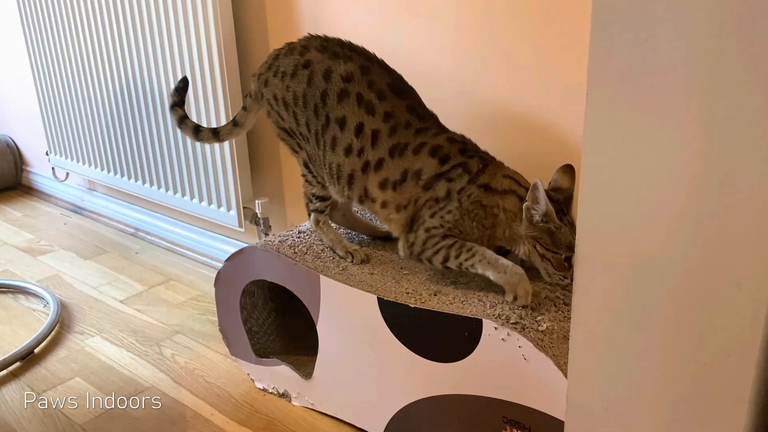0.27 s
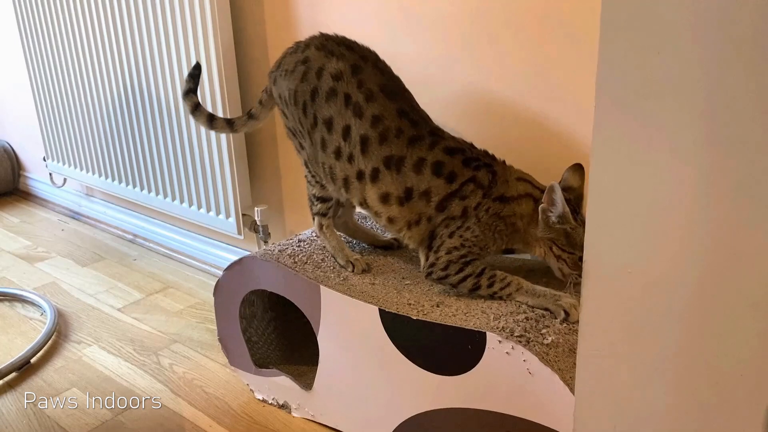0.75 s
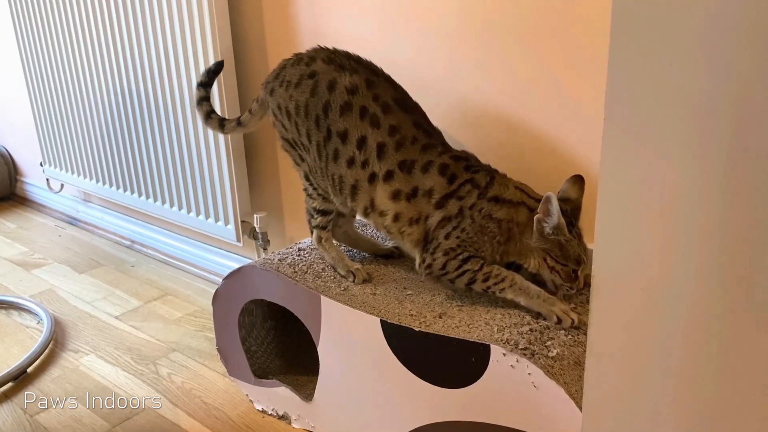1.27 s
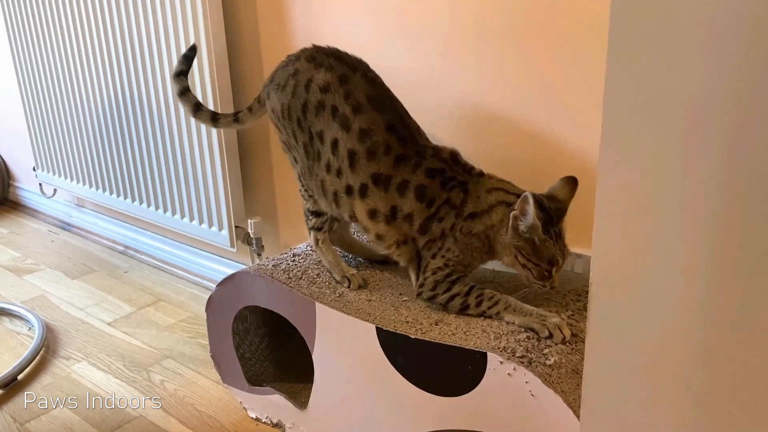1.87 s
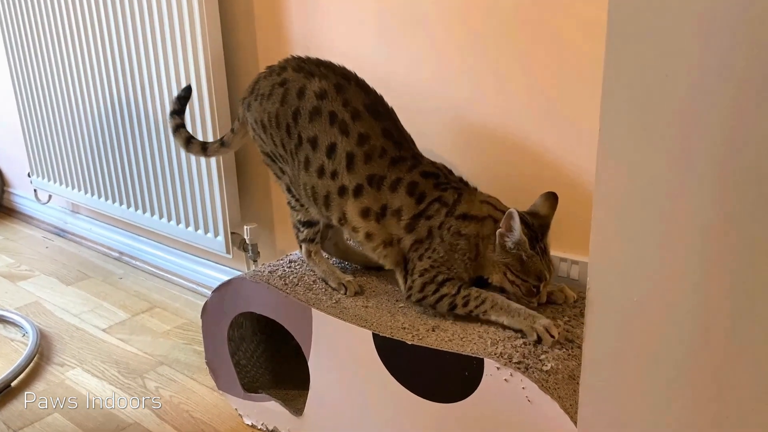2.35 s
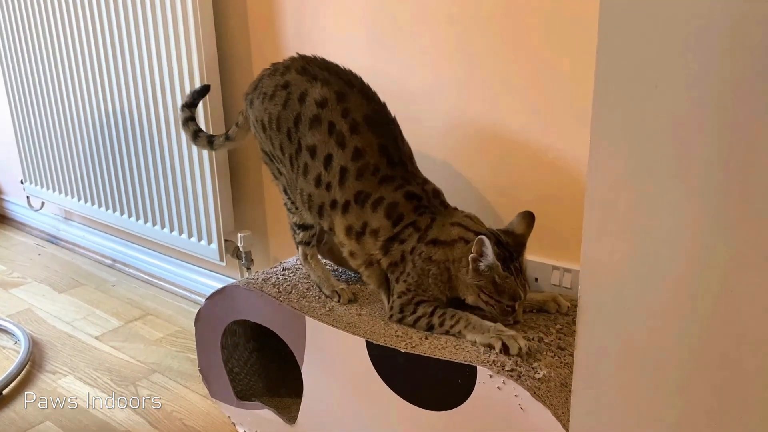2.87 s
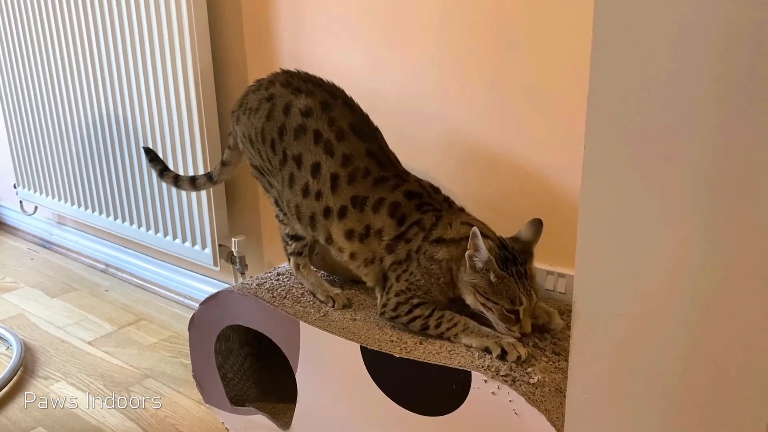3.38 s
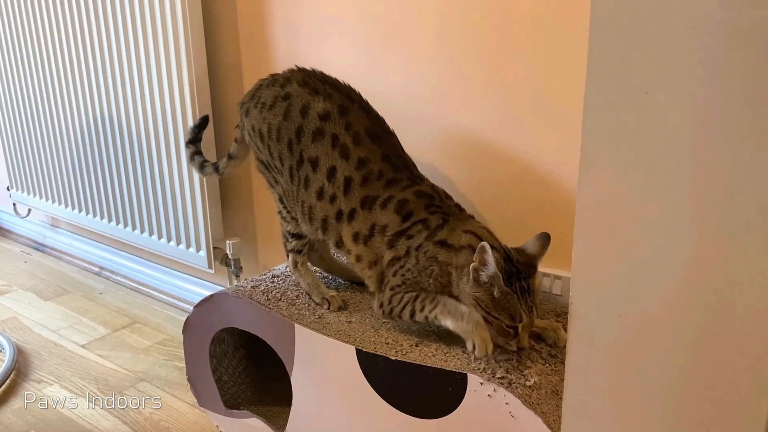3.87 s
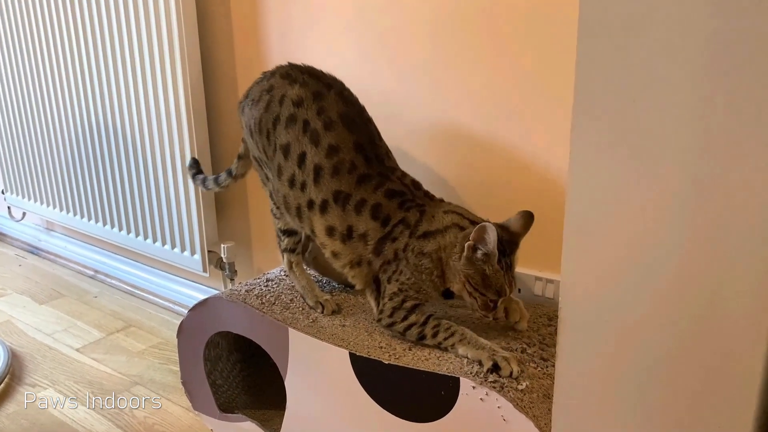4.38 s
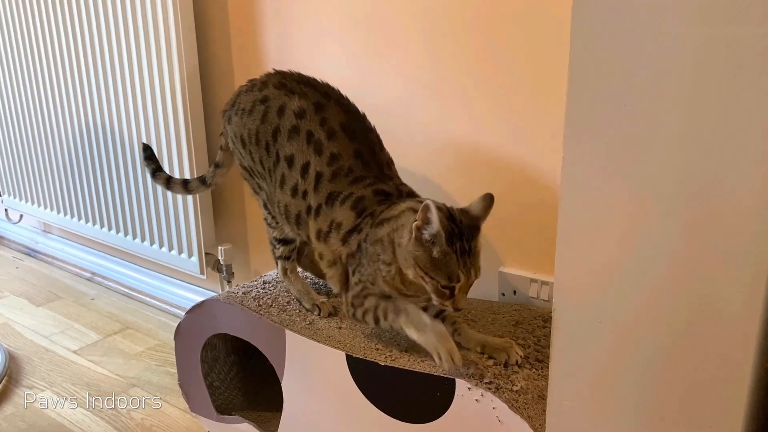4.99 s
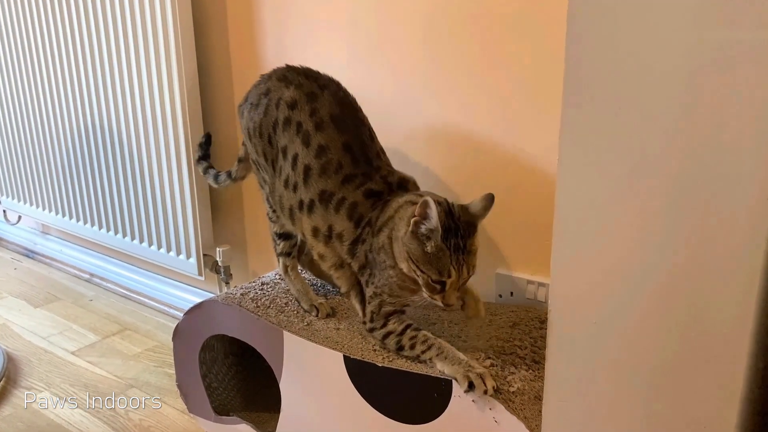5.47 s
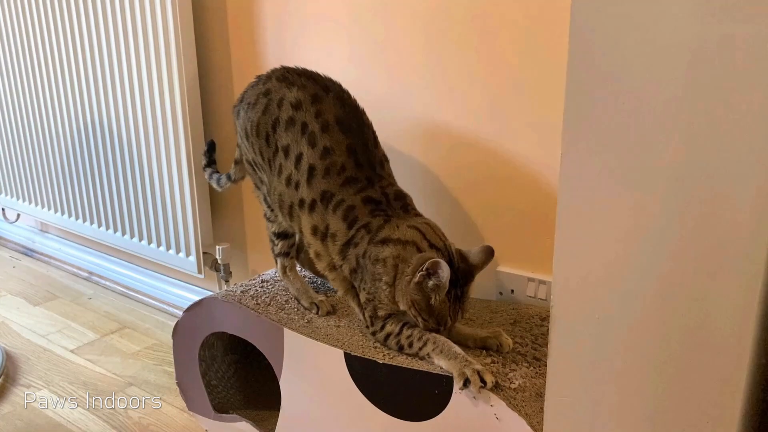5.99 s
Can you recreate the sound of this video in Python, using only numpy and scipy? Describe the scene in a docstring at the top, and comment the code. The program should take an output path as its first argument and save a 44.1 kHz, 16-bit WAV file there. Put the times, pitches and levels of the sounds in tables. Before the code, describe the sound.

In a bare living room with a wooden floor, a cat scratches a hollow cardboard box. Short rasping tugs come in irregular clusters, each with gritty fibre tearing, a woody rattle and a low boxy knock. Small ribs snap and paws rub softly between strokes. Near the end the scratching stops with a weak tug and a brief slide. A stereo microphone nearby catches short room echoes and a faint low hum.

```python
"""A cat rakes a hollow cardboard scratcher in a bare living room with a wooden floor.
A low hum and still air come first: a wavering sine and coloured noise. A rib snaps at once, a noise burst.
From 0.1 s each tug of the claws is a swelling train of stick-slip impulses that tears fibres and rings box,
deck and ribs; more ribs snap, and paws drag softly. After the last tug, at 5.94 s, the shuffling stops and
one short slide follows. Each sound excites a tail of room echoes half a second long."""
import sys
import numpy as np
from scipy import signal
from scipy.fft import rfft, irfft, next_fast_len
from scipy.io import wavfile
from scipy.ndimage import uniform_filter1d, map_coordinates

SR = 44100
rng = np.random.default_rng(int(sys.argv[2]) if len(sys.argv) > 2 else 0)


def file_out(sig):
    """Save sig as 16-bit WAV at sys.argv[1]."""
    # one column per channel
    cols = np.atleast_2d(sig).T
    # limit, then scale
    lim = np.clip(cols, -1, 1)
    pcm = np.round(lim * 32767).astype(np.int16)
    wavfile.write(sys.argv[1], SR, pcm)


N = 274743

# Still room air: (frequency [Hz], relative density [dB per Hz])
AMBIENT = [(15, -30), (28, -15), (43, 3), (60, 6.5), (85, -1.5), (130, 0.5), (200, -12), (400, -22),
           (800, -11.5), (1200, -19), (2000, -33.5), (4000, -66), (16000, -73)]
# Swell of the hum: (time [s], relative level [dB])
HUM = [(0.0, -51.5), (1.55, -41.5), (1.7, -51), (4.25, -61), (4.5, -43.5), (4.68, -70), (5.0, -52),
       (5.6, -47.5), (5.9, -72)]
HUM_HZ = 63.24  # centre of the wavering pitch
# Decay of the room: (frequency [Hz], time to fall by 60 dB [s])
WALLS = [(100, 0.81), (260, 0.22), (700, 0.46), (1840, 0.43), (4850, 0.33), (12800, 0.24)]
# Likeness of the two channels in a diffuse field: (frequency [Hz], left-right correlation [1])
ALIKE = [(60, 0.97), (130, 0.97), (290, 0.77), (500, 0.52), (750, 0.096), (1300, 0.033), (2400, 0.073),
         (5000, 0.3), (7000, 0.38), (9000, 0.74), (15000, 0.22)]
# Phase between the microphone ports: (frequency [Hz], lead of the left port [rad])
PORTS = [(350, 0), (1030, 1.25), (2000, 0.64), (4800, 0.5), (5600, -1.9), (6500, 0.5), (7200, 0),
         (11100, -6), (15300, -12.5), (16500, -23)]
TOP_HZ = 16100  # band limit of the microphones
# Lean of the scratching to the left: (frequency [Hz], left minus right [dB])
LEAN = [(60, -2.5), (250, -2.0), (500, -3.5), (1000, 2.5), (2000, 0.0), (8000, 0)]

# Panel resonances of the hollow box: (frequency [Hz], width [Hz], relative level [dB])
BOX = [(107.5, 14.4, 3), (130, 15.4, -1.5), (150, 12, -2.5), (175.7, 15, -2), (232, 28, -2),
       (249, 9.3, -2.5), (301.8, 25.6, -5), (336, 17, -6)]
# Flexing of the corrugated deck: (frequency [Hz], relative density [dB per Hz])
DECK = [(300, -27), (430, -6.5), (480, 3), (560, -1.5), (720, -1), (830, -0.5), (1100, -2.5), (1400, -9),
        (1900, -19.5), (3000, -31), (6000, -50.5)]
# Narrow resonances of deck and ribs: (frequency [Hz], width [Hz], relative level [dB])
RIBS = [(634, 7.6, 2), (675, 21, 4), (787, 9.8, 0), (2254, 7.1, -3.5), (2405, 69, -1.5), (4420, 28, -3)]
# Ribs under the grating claws: (frequency [Hz], relative density [dB per Hz])
GRATE = [(400, -26.5), (900, 8), (1600, 4.5), (2100, 3), (2700, 2.5), (3300, -5.5), (4500, -16.5),
         (8000, -41.5)]
# Tearing paper fibres: (frequency [Hz], relative density [dB per Hz])
FIBRE = [(1500, -35.5), (2600, -2.5), (3600, 0.5), (4700, -0.5), (5800, -2.5), (7200, -4.5), (9000, -5),
         (11200, -5), (13200, -7), (15500, -7.5)]

# Slow slides of a paw over the deck:
# (start of the hold [s], length of the hold [s], relative level of the rub [dB], rustle over the rub [dB])
DRAGS = [(0.215, 0.079, -59.5, -7), (0.472, 0.13, -52, -13), (1.273, .43, -54.5, -13.5),
         (1.873, 0.17, -51.5, -7), (2.243, 0.017, -64, -34), (2.39, 0.013, -60, -18),
         (2.71, 0.31, -61, -19), (3.436, 0.077, -59, -8.5), (4.044, 0.042, -53.5, -15),
         (4.209, 0.027, -58, -4.5), (4.722, 0.091, -49.5, -13), (5.16, 0.34, -59, -8.5),
         (5.805, 0.031, -62.5, -7), (6.21, 0.022, -66.5, -2)]
DRAG_ATTACK_S, DRAG_RELEASE_S = 0.041, 0.039
SHUFFLE_DB, RUSTLE_DB, SHUFFLE_END_S = -67, -7.5, 5.95  # shuffling; its rustle over its rub
CATCH_RATE, CATCH_DB = 22, -7.5  # stray ribs caught by a sliding claw [per s]; relative level
# Claws flicking off single ribs:
# (time [s], relative level [dB], deck kick over that level [dB], treble boost of the crack [dB])
SNAPS = [(0.0171, -60, 8.5, 7), (0.1179, -51, 11.5, -13), (0.756, -47.5, 0, 5), (1.1794, -44, 10, 6),
         (1.321, -61, 11, 10), (1.8228, -68, 26.5, 5), (1.886, -64.5, 27, -5), (1.9362, -46.5, 20.5, 16),
         (2.2374, -64.5, 17, 0), (2.4418, -56.5, 29.5, -8), (2.6696, -46.5, 5.5, 14),
         (2.764, -36, 4.5, 13.5), (3.1589, -54.5, 16, 13), (3.2562, -51, -1, 8), (3.2681, -48, 24, -12),
         (3.3412, -53, 13, 0), (3.4877, -63.5, 17.5, 5.5), (3.606, -65.5, 0, -5), (4.049, -61.5, 8, -13),
         (4.0703, -56, 2, 13), (4.666, -59, 16, -11), (4.7806, -54, 14, 0), (4.8704, -54, 20.5, -25),
         (5.043, -46, 18.5, -9), (5.1755, -60, 0, -11), (5.387, -42.5, 10.5, 5), (5.5205, -54.5, 23, 9),
         (5.642, -48.5, 1, 6)]
# Tugs of the claws: (start [s], rise before a part's lag is added [s], strength [dB], weight on the box [dB],
# bite into the paper [dB], box note [Hz], deck note [Hz])
TUGS = [(0.108, .007, -45.5, 6, 4, 133, 685), (0.295, 0.0086, -33, 1, 0, 157, 493),
        (0.334, 0.001, -37, -4.5, -7.5, 136, 660), (0.672, 0.0061, -50.5, 6, -2.5, 207, 730),
        (0.747, .012, -37, 4, -1.5, 277, 643), (0.792, 0.0023, -54, 8, 17, 274, 670),
        (0.981, 0.0042, -44.5, -7, -8, 104, 750), (1.173, 0.019, -45, 2, -1.5, 169, 700),
        (1.312, 0.0022, -42, -6, 0, 151, 940), (1.346, .018, -48.5, 4, 1, 142, 1020),
        (1.404, 0.0026, -43, 1.5, -22, 153, 690), (1.45, 0.0052, -43.5, 1, 3.5, 119, 920),
        (1.535, 0.0084, -47, -6, 0, 188, 690), (1.842, 0.0046, -57.5, 9, 9, 229, 455),
        (1.936, 0.0025, -29, 5, 2.5, 310, 734), (1.97, 0.0084, -37.5, 0, -8, 108, 590),
        (2.234, 0.0019, -45, -7.5, -19, 106, 430), (2.437, 0.011, -38, 3, -1.5, 337, 723),
        (2.663, 0.009, -55, 0.5, 6.5, 103, 800), (2.762, 0.0042, -33.5, -1.5, 2.5, 172, 670),
        (2.846, 0.005, -45.5, -6, -8, 126, 724), (3.15, .0055, -38.5, 0.5, -8.5, 347, 840),
        (3.249, 0.0064, -32, 2, 0.5, 179, 420), (3.304, 0.0063, -40.5, -3, -15, 184, 950),
        (3.704, 0.0015, -44.5, -2.5, -6.5, 137, 554), (3.83, 0.0054, -37.5, -0.5, 0.5, 256, 530),
        (3.95, 0.0032, -53.5, 0, 9, 100, 950), (4.263, 0.0024, -54.5, 0, 9.5, 262, 850),
        (4.313, 0.0096, -40, 4, -0.5, 229, 784), (4.404, 0.0062, -33, -1, -0.5, 170, 760),
        (4.467, 0.041, -55, 2, -1, 100, 754), (4.661, 0.011, -50, -10, 2, 237, 530),
        (4.868, 0.0013, -37, 3.5, -6.5, 137, 547), (4.949, 0.022, -50.5, -4.5, 0, 124, 495),
        (5.037, 0.0053, -36, 0.5, 1, 179, 1090), (5.08, 0.0059, -43.5, -5, -0.5, 104, 640),
        (5.287, 0.0025, -48.5, -0.5, -5, 101, 780), (5.371, 0.029, -50, 3.5, 1.5, 248, 470),
        (5.519, 0.0074, -37, 4.5, -7.5, 215, 1100), (5.552, 0.0064, -37.5, -20, 4, 133, 555),
        (5.939, 0.008, -52.5, 2, 9, 150, 467)]
FIRM_DB = -35.5  # strength of a firm tug
THUMP_DB, THUMP_GROWS = -36, 0.65  # box under a firm tug; its growth [dB per dB of strength]
GRATE_DB, CRACKLE_DB, CRACKLE_BITES = -1, -8, 0.84  # ribs and fibres re strength; crackle [dB per dB of bite]


def amp(db):
    """The decibel law: level to amplitude ratio."""
    return 10 ** (np.asarray(db) / 20)


def unit(x):
    """Normalisation of power: x scaled to rms 1."""
    return x / np.sqrt(np.mean(x ** 2) + 1e-20)


def along(points, hz):
    """Logarithmic frequency scale: (frequency [Hz], value) points interpolated along it."""
    f, v = np.transpose(points)
    return np.interp(np.log(hz + 1), np.log(f + 1), v)


def curves(rows):
    """Linear interpolation in time: one value per sample for each column after the time."""
    s, *cols = np.transpose(rows)
    return [np.interp(np.arange(N) / SR, s, c) for c in cols]


def wobble(rate):
    """Band-limited fluctuation: a smooth curve through random knots, rate of them per second."""
    knots = rng.standard_normal(int(N * rate / SR) + 4)
    return map_coordinates(knots, [np.arange(N) * rate / SR])


def filtered(x, response):
    """Linear filtering: the spectrum of x times a response of frequency."""
    n = x.shape[-1]
    m = next_fast_len(n + SR // 2)
    hz = np.fft.rfftfreq(m, 1 / SR)
    return irfft(rfft(x, m) * response(hz), m)[..., :n]


def peaks(modes, hz):
    """Superposition of damped resonators: the sum of their power responses."""
    return sum(amp(db) ** 2 * (hz * w) ** 2 / ((c * c - hz * hz) ** 2 + (hz * w) ** 2)
               for c, w, db in modes)


def ring(x, gain, size=8192):
    """Causality: convolution with a minimum-phase body of energy 1, shaped by the given gain."""
    hz = np.fft.rfftfreq(size, 1 / SR)
    cepstrum = irfft(np.log(np.maximum(gain(hz), 1e-6)))
    cepstrum[1:size // 2] *= 2  # folding the cepstrum gives the minimum phase
    cepstrum[size // 2 + 1:] = 0
    body = irfft(np.exp(rfft(cepstrum)))
    return signal.fftconvolve(x, body / np.linalg.norm(body))[:N]


def slips(rate, spread_db, size=900):
    """Stick-slip friction: random impulses of uneven strength, locally evened out, at rms 1."""
    happens = rng.random(N) < rate / SR
    sign = rng.choice([-1, 1], N)
    hits = unit(happens * sign * amp(spread_db * rng.standard_normal(N)))
    local_power = np.abs(uniform_filter1d(hits ** 2, size))
    return unit(hits / np.sqrt(local_power + 0.33))


def diffuse(pair):
    """Diffuse-field coherence: two unrelated signals mixed to the tabled left-right correlation."""
    def mid_side(hz):
        angle = np.arccos(np.clip(along(ALIKE, hz), -1, 1)) / 2
        return np.array([np.cos(angle), np.sin(angle)])

    mid, side = filtered(pair, mid_side)
    return np.array([mid + side, mid - side])


def background():
    """Stationary noise and a frequency-modulated tone: still room air and a wavering low hum."""
    noise = rng.standard_normal((2, N))
    air = unit(diffuse(filtered(noise, lambda hz: amp(along(AMBIENT, hz)))))
    phase = 2 * np.pi * np.cumsum(HUM_HZ + 1.58 * wobble(4.91)) / SR
    hum = amp(curves(HUM)[0] - 2.5) * unit(np.sin(phase))
    return amp(-51.5) * air + hum


def room_tail(gap):
    """Exponential reverberant decay: each band dies at its own speed, with about equal energy."""
    hz, t, z = signal.stft(rng.standard_normal((2, SR // 2)), SR, nperseg=256)
    t60 = along(WALLS, hz)[:, None]
    decaying = z * amp(-60 * t / t60) / np.sqrt(t60)
    tail = diffuse(signal.istft(decaying, SR, nperseg=256)[1])
    t = np.arange(tail.shape[1]) / SR
    tail *= 1 - np.exp(-(t / gap) ** 2)  # the nearest wall answers after a short gap [s]
    return tail / np.sqrt(np.sum(tail ** 2) / 2)


def room(x, count=12):
    """Varied echoes: crossfades cycle steadily through several random tails, about 40 per second."""
    turn = np.arange(N) / (SR // 40) % count
    echoes = 0
    for k in range(count):
        away = np.abs((turn - k + count / 2) % count - count / 2)
        share = np.sin(np.pi / 2 * np.maximum(1 - away, 0))  # equal-power crossfade
        echoes = echoes + signal.oaconvolve((x * share)[None], room_tail(gap=0.00058), axes=1)[:, :N]
    return echoes


def drag_pressure():
    """Addition of powers: slides set in, hold and ease off over faint shuffling; rub and rustle strengths."""
    t = np.arange(N) / SR
    power = 0
    for s, length, db, rustle_db in [(0, SHUFFLE_END_S, SHUFFLE_DB, RUSTLE_DB), *DRAGS]:
        corners = [s - DRAG_ATTACK_S, s, s + length, s + length + DRAG_RELEASE_S]
        hold = np.interp(t, corners, [0, 1, 1, 0])
        power = power + np.outer(amp([db, db + rustle_db]), hold) ** 2
    return np.sqrt(power)


def rib_snaps(t60, rattle_t60, pop_db, tick_db):
    """Impulsive release: a freed rib gives the deck a rattling kick and its fibres a very short crack."""
    pops, ticks = np.zeros(N + SR), np.zeros(N + SR)
    t = np.arange(SR // 50) / SR
    for s, level_db, kick_db, sharp_db in SNAPS:
        crack = rng.standard_normal(len(t)) * amp(-60 * t / t60)
        crack = filtered(crack, lambda hz: amp(sharp_db / (1 + (9000 / (hz + 1)) ** 6)))
        kick = rng.standard_normal(len(t)) ** 3 * amp(-60 * t / rattle_t60)  # the cube makes it spiky
        span = slice(round(s * SR), round(s * SR) + len(t))
        pops[span] += amp(level_db + kick_db + pop_db) * kick / np.linalg.norm(kick)
        ticks[span] += amp(level_db + tick_db) * crack / np.linalg.norm(crack)
    return pops[:N], ticks[:N]


def tugs(levels, slip, lag, lead_in_db, notes=None, q=6, note_db=0):
    """Inertia: each tug swells, later by a part's lag [s], and lets go; a short fade-in precedes its start."""
    lead = SR // 20
    force = np.zeros(N + SR)
    t = np.arange(-lead, SR // 3) / SR
    slip = np.pad(slip, (lead, SR))
    for k, (s, rise, *_) in enumerate(TUGS):
        span = slice(round(s * SR), round(s * SR) + len(t))
        u = np.maximum(t, 0) / (max(rise, .001) + lag)
        swell = u * np.exp(1 - u)
        lead_in = amp(lead_in_db - 60 * np.abs(t) / 0.063)  # fades on both sides of the start
        burst = amp(levels[k]) * np.maximum(swell, lead_in) * slip[span]
        if notes is not None:  # the spot where the paw grips favours one note of the board
            burst = burst + amp(note_db) * signal.lfilter(*signal.iirpeak(notes[k], q, SR), burst)
        force[span] += burst
    return force[lead:lead + N]


def scratching():
    """Source and resonator: claw slips grate ribs and tear fibres at once; deck, then box, follow."""
    strength_db, weight_db, bite_db, box_hz, deck_hz = np.transpose(TUGS)[2:]
    thump_db = THUMP_DB + THUMP_GROWS * (strength_db - FIRM_DB) + weight_db
    grate_db = strength_db + GRATE_DB + bite_db
    crackle_db = strength_db + CRACKLE_DB + CRACKLE_BITES * bite_db

    tearing = slips(rate=520, spread_db=6)
    snagging = unit(amp(3.3 * wobble(140)))  # the claws hop from rib to rib
    thump = tugs(thump_db, tearing, lag=0.0085, lead_in_db=-12.5, notes=box_hz, q=8.9, note_db=2)
    flex = tugs(strength_db, tearing, lag=0.0046, lead_in_db=-20.5, notes=deck_hz, q=10, note_db=4)
    grate = tugs(grate_db, snagging * slips(rate=480, spread_db=5.5), lag=0.00011, lead_in_db=-17)
    crackle = tugs(crackle_db, snagging * slips(rate=1400, spread_db=5.0), lag=0.00027, lead_in_db=-5.5)
    pops, ticks = rib_snaps(t60=0.013, rattle_t60=0.019, pop_db=19.5, tick_db=21.5)

    rubbing, rustling = drag_pressure() * amp(2.1 * wobble(24))  # sliding claws catch and run free
    rub = rubbing * slips(rate=150, spread_db=1.5)
    rustle = rustling * slips(rate=220, spread_db=0.5)
    catches = amp(CATCH_DB) * rubbing * slips(rate=CATCH_RATE, spread_db=6)

    def ribbed(spectrum):
        return lambda hz: amp(along(spectrum, hz)) * np.sqrt(1 + 2 * peaks(RIBS, hz))

    def hollow(hz):
        above, below = 1 + (hz / 520) ** 6, 1 + (85 / (hz + 1)) ** 6  # roll-off outside 85-520 Hz
        return np.sqrt(peaks(BOX, hz) / above / below)

    box = ring(thump + rub, hollow)
    deck = ring(flex + amp(-2.2) * rub + pops, ribbed(DECK))
    ribs = ring(grate + amp(-11) * rub + catches + pops, ribbed(GRATE))
    fibres = ring(crackle + rustle, ribbed(FIBRE))
    cracks = ring(ticks, ribbed(FIBRE))
    return amp(1.37) * box, amp(-0.73) * deck + amp(-2.0) * ribs, amp(-0.9) * fibres, cracks


def scene():
    """Direct and reverberant sound: box and cracks mostly direct, scraping mostly by way of the walls."""
    box, deck, fibres, cracks = scratching()
    direct = amp(-1.5) * box + amp(-5.5) * deck + amp(-6.0) * fibres + amp(2.0) * cracks
    echoes = room(amp(-5.5) * box + amp(-2.0) * deck + amp(-1.03) * (fibres + cracks))
    # level difference between the channels: the box leans a little to the right
    leaning = filtered(direct + echoes, lambda hz: amp(np.outer([.5, -.5], along(LEAN, hz))))
    return leaning + background()


def record(dry):
    """Frequency-dependent phase between the channels: two microphone ports, silent above their band limit."""
    def ports(hz):
        phase = np.outer([.5, -.5], along(PORTS, hz))
        return np.exp(1j * phase) * (hz < TOP_HZ)

    return filtered(dry, ports)


dry = scene()
out = record(dry)
file_out(out)
```